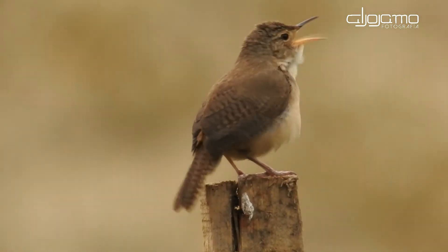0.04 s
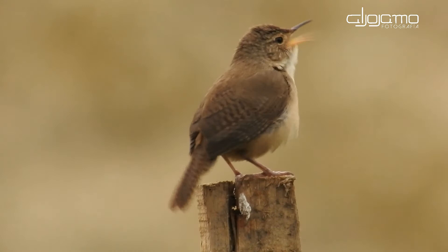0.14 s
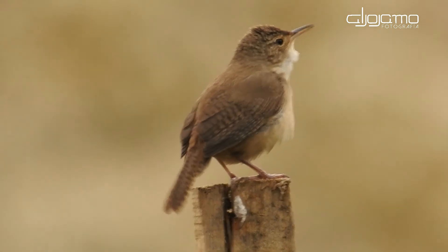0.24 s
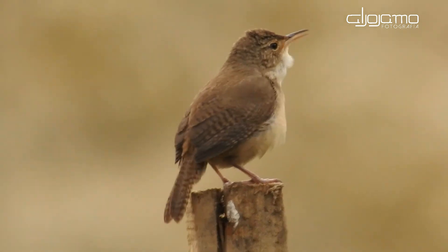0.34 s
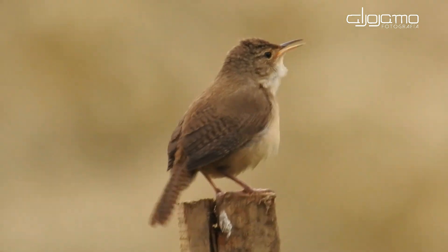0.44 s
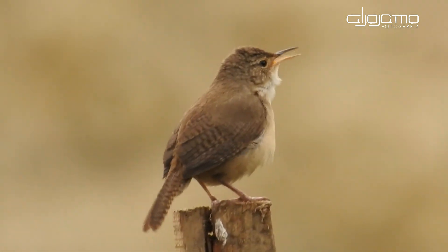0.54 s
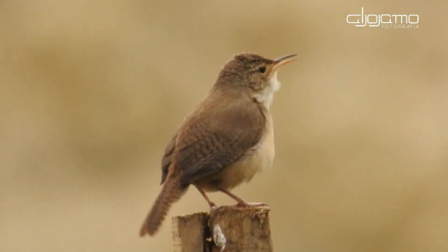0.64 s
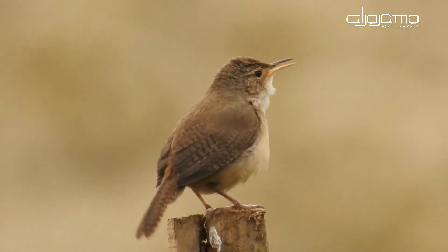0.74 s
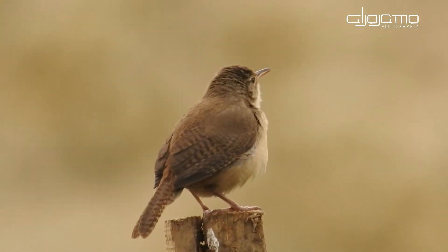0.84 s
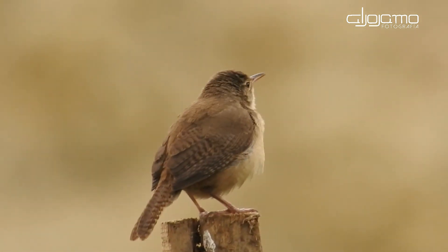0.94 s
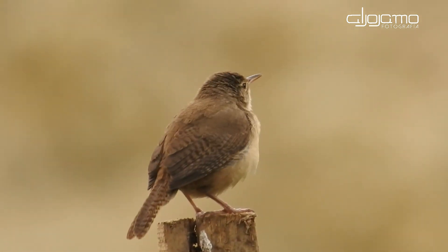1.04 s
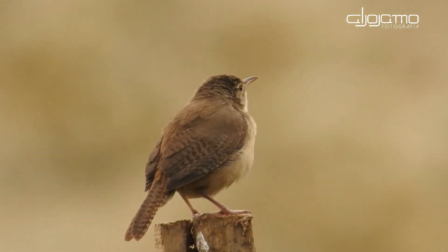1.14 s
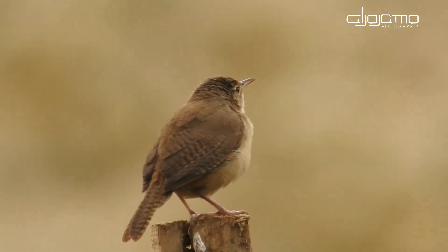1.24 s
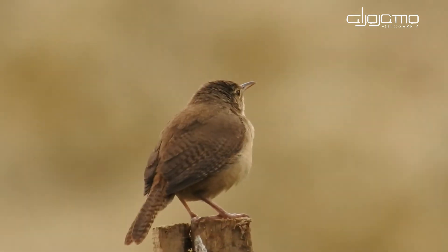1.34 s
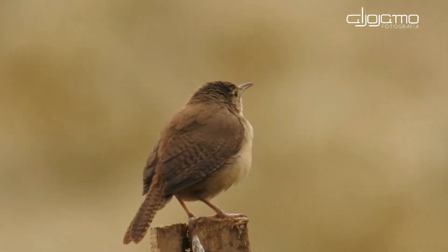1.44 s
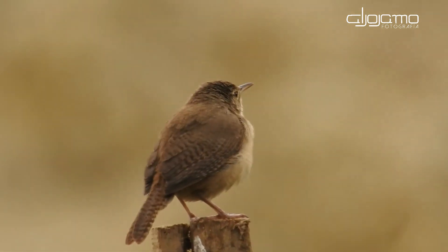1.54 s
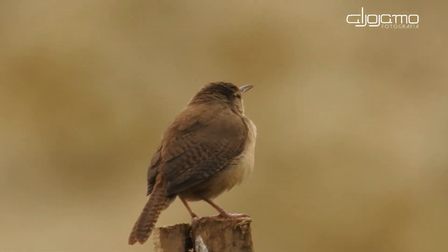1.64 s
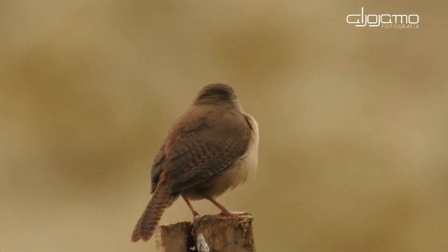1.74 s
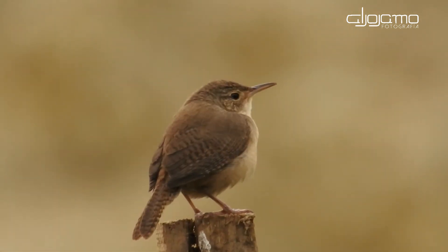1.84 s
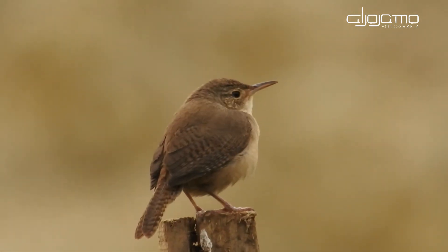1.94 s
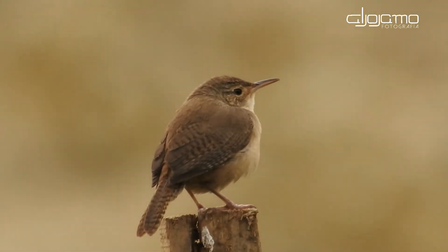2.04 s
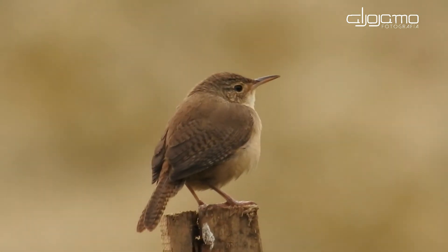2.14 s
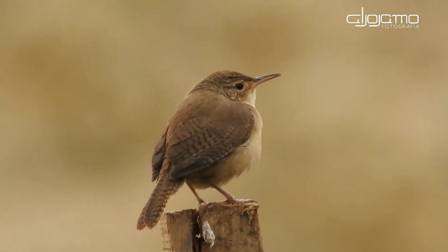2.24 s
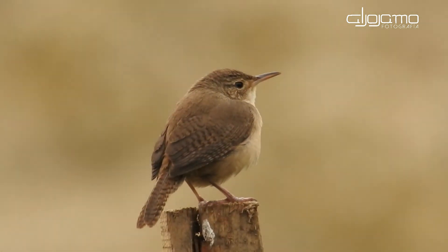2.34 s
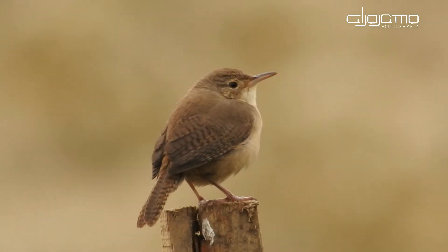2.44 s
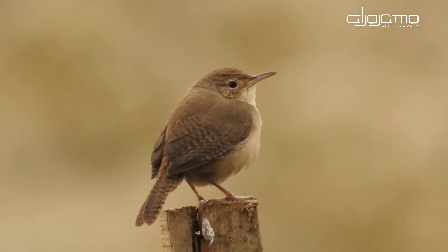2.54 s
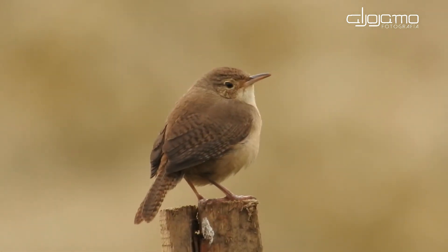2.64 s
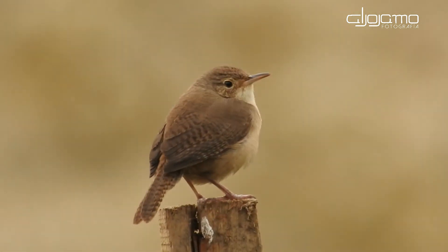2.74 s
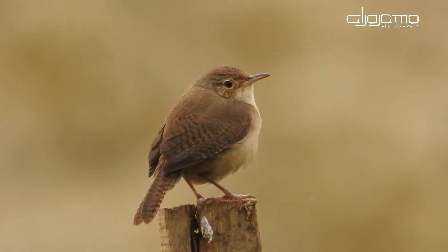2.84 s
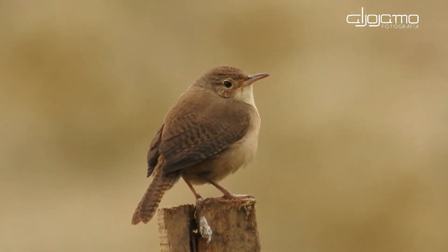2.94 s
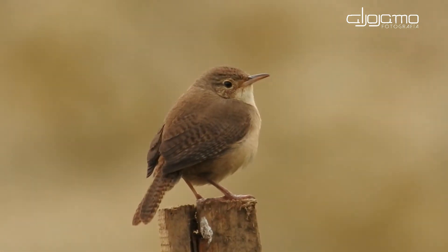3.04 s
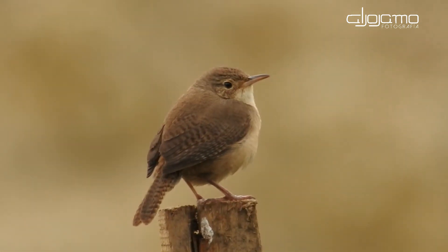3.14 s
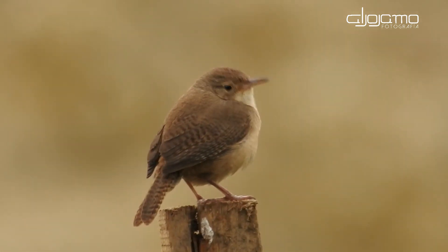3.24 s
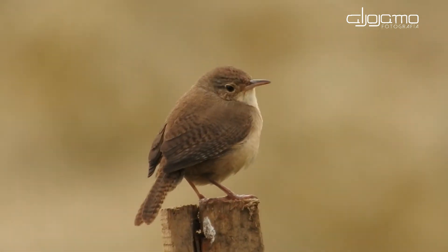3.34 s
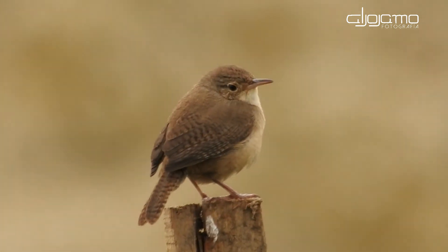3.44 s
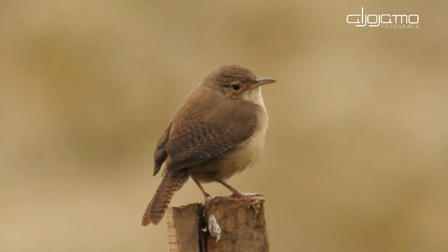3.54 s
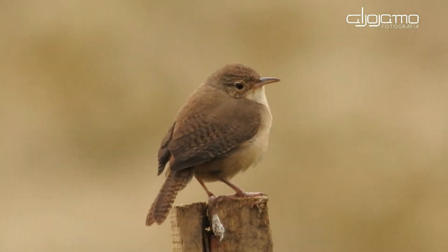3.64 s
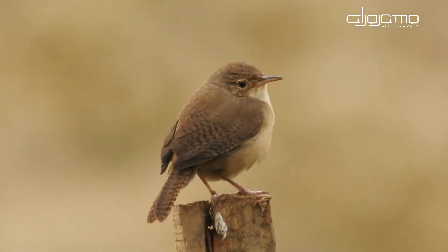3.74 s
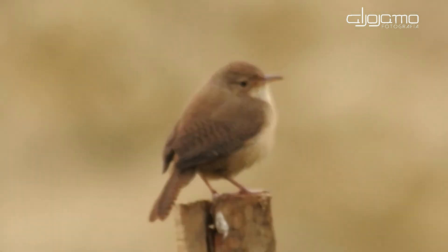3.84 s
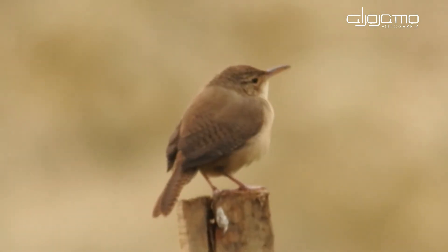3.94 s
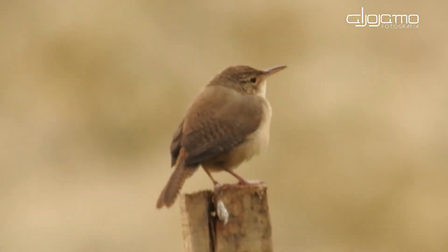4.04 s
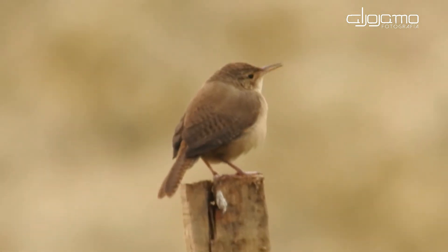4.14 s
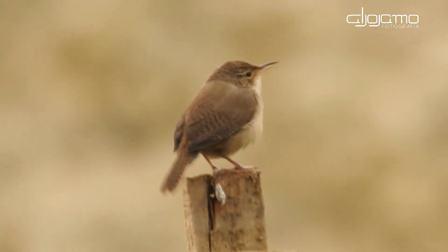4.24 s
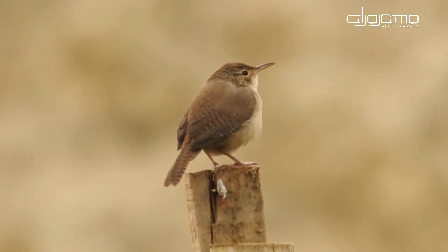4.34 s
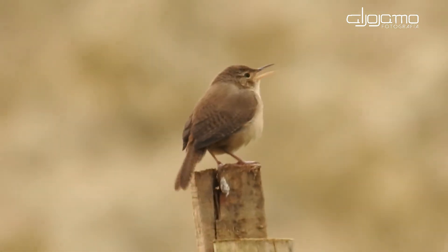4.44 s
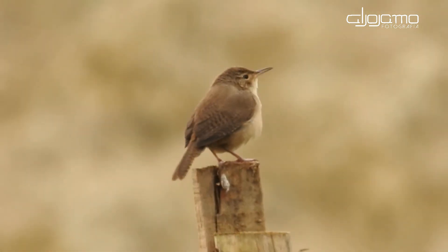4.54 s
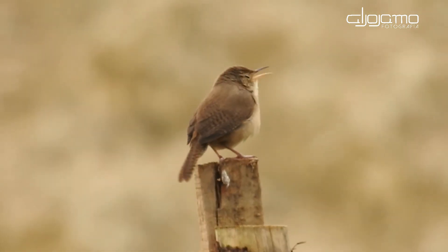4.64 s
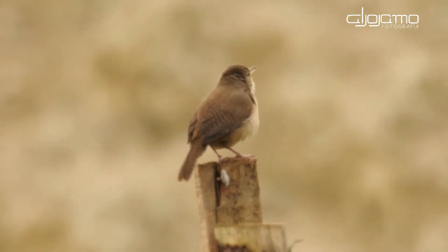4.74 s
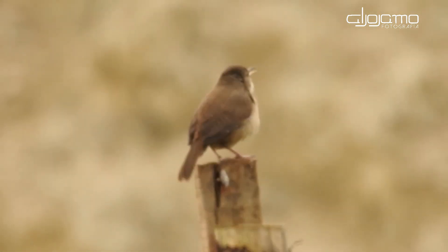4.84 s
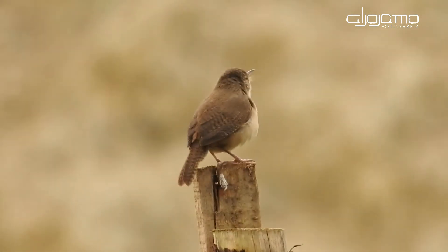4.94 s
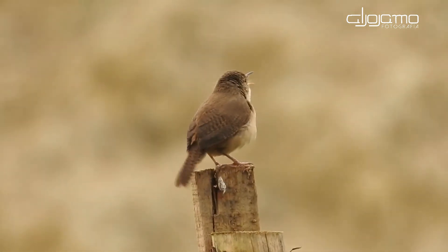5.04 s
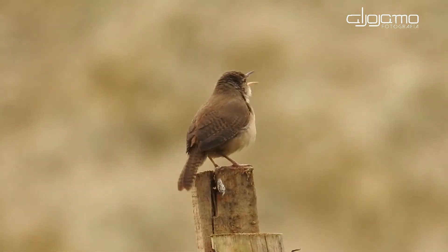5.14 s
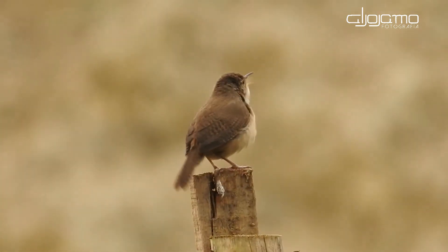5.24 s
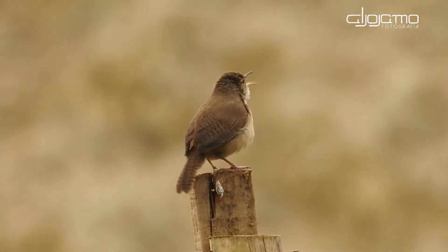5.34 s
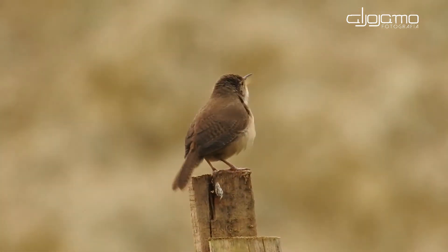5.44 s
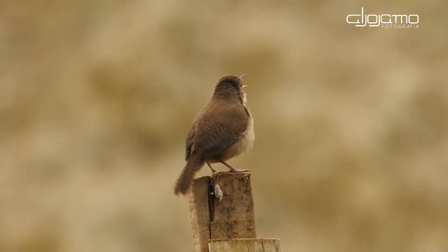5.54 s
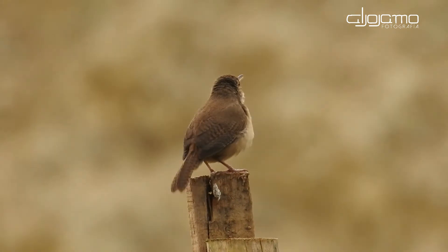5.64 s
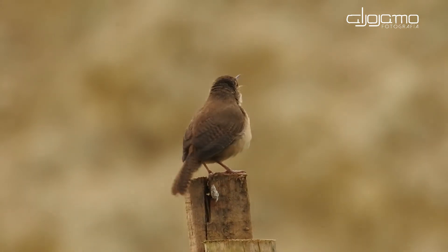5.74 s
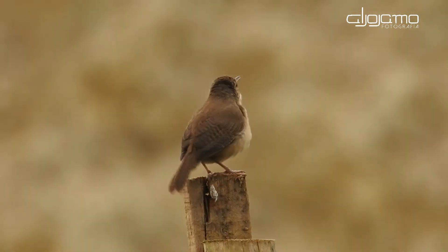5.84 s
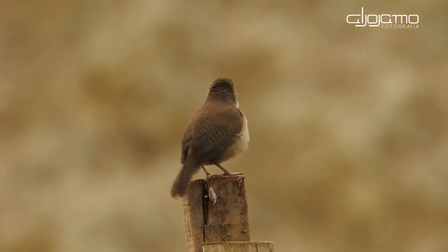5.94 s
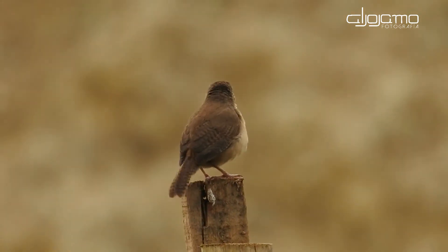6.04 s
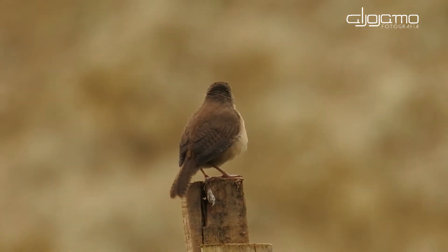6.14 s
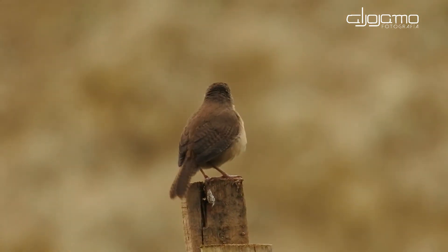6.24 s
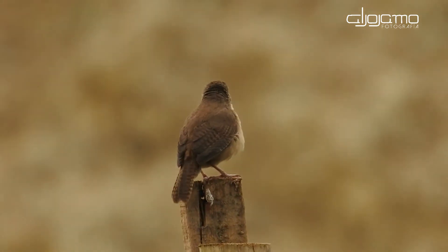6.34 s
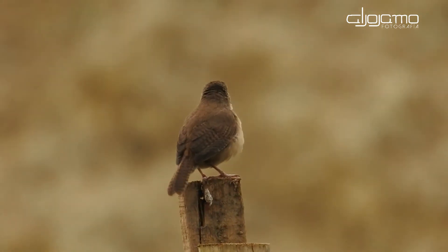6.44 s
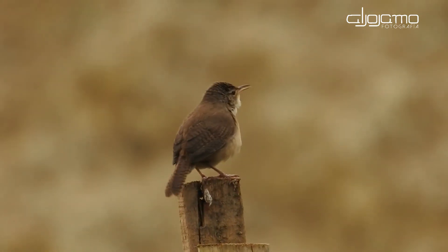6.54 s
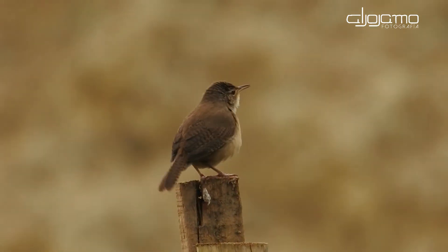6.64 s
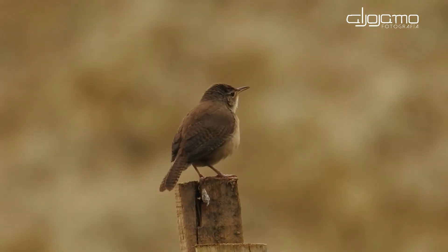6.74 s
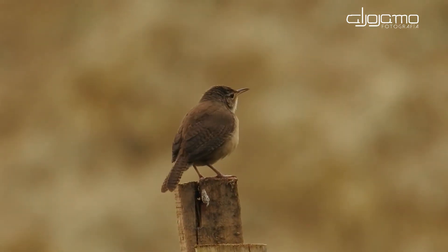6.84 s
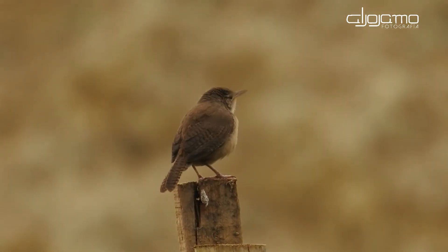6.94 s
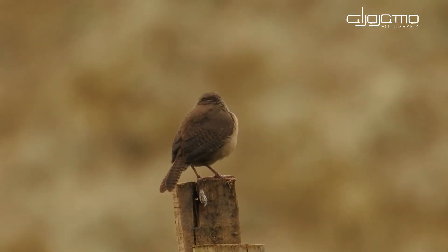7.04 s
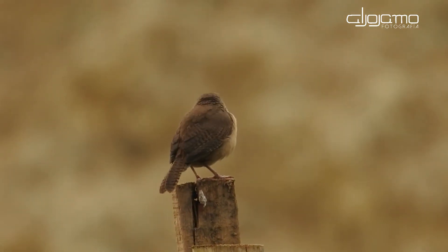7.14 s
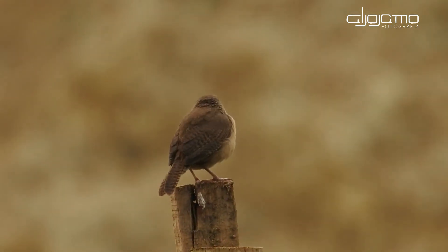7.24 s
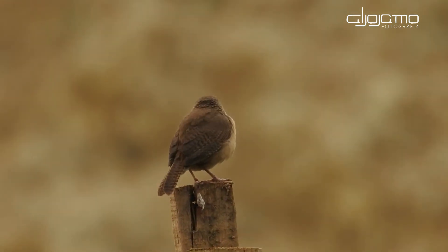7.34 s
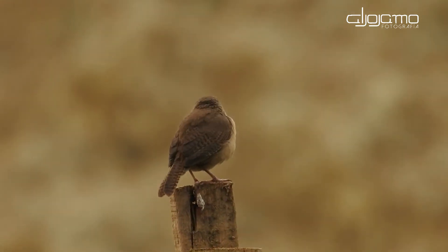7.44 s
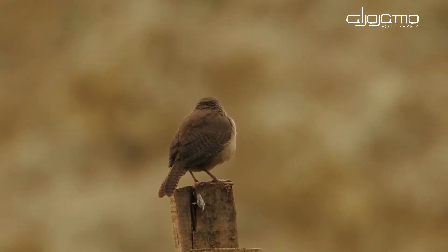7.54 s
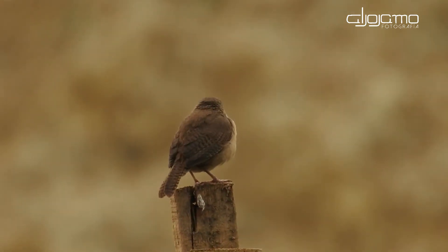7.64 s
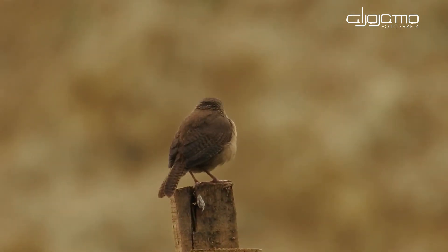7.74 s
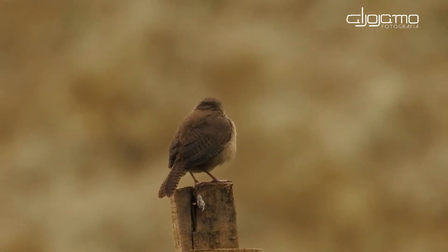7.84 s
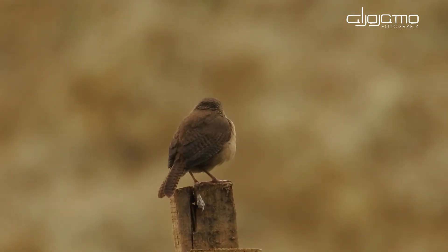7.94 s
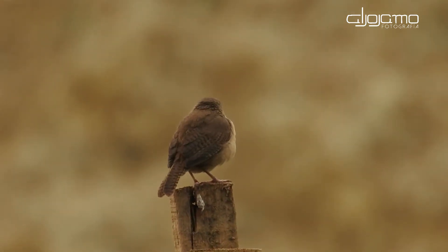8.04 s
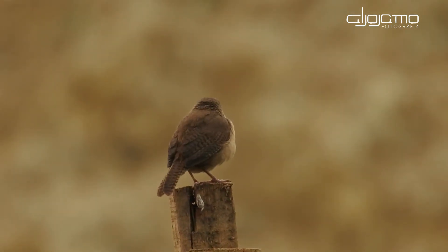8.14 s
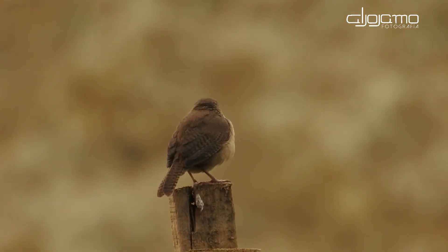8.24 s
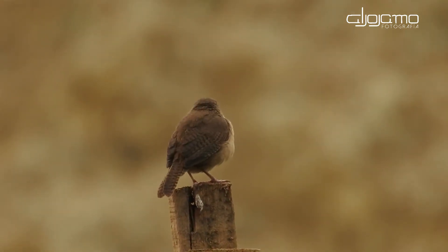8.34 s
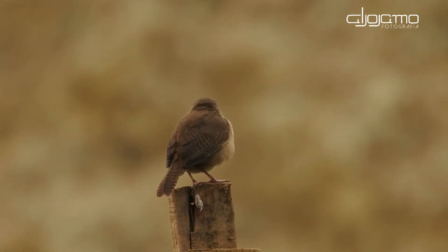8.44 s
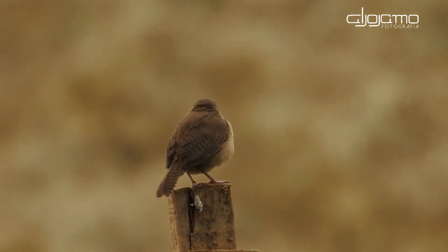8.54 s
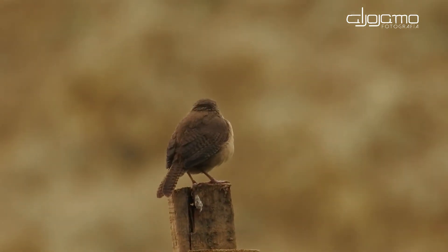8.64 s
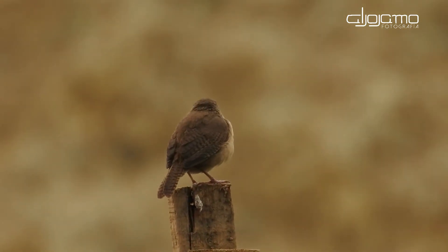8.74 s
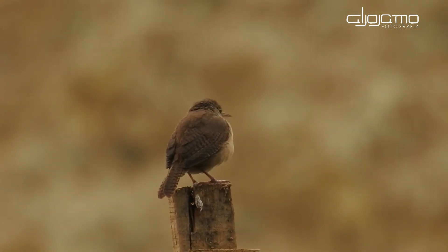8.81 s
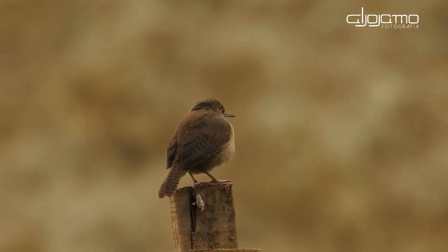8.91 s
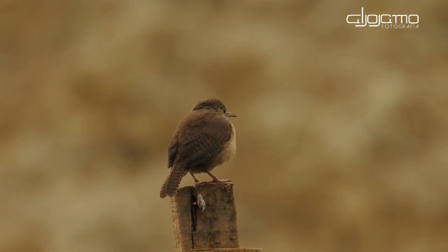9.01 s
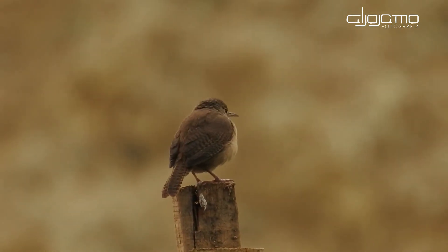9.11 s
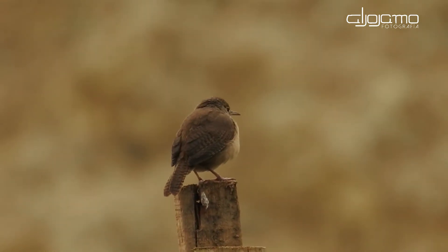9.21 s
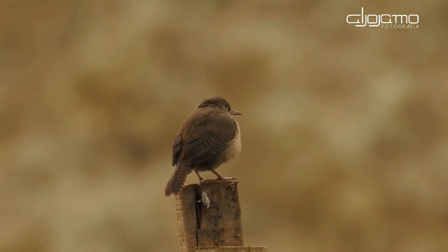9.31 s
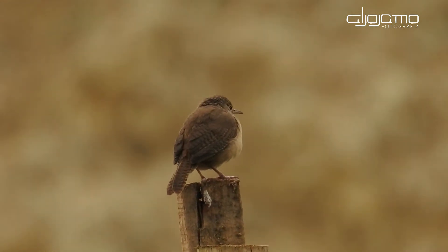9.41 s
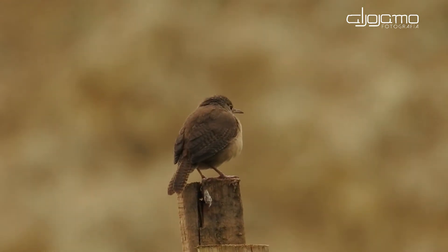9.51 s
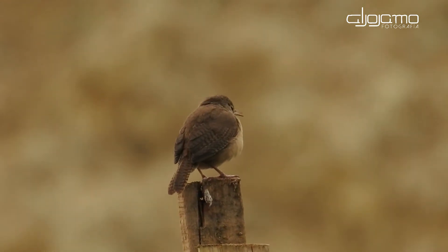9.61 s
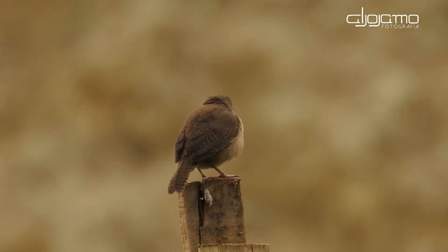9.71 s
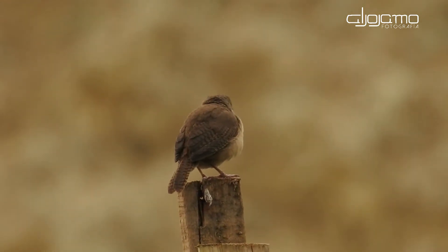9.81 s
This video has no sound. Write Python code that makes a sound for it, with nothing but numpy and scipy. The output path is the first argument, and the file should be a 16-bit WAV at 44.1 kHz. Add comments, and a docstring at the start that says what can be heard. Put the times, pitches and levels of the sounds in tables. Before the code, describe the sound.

A quiet outdoor place with faint flickering insect hiss and a short scattering echo from leaves. At 0 s a wren is already singing: loud, clean, rapidly bent high whistles until about 0.4 s, a softer low dip, then a dry low rattle from 0.5 to 0.9 s. Another bird whistles a thin high run at 0.8-1.1 s. From 1.1 to 3.8 s it is sparse: small chips, very faint calls and a distant downward slide at 3.25 s with an echo. From 3.85 to 5 s, hoarse churrs, rustling, ticks and dull knocks near the microphone surround soft squeaky wren notes. At 5-6.2 s the loud trill returns, alternating rising and hooked notes over a faint low hum, with a weaker rattle at 6.5-6.75 s. Until nearly 10 s only scattered chips, faint churrs, a far tiny trill around 8.0-8.5 s and distant whistles remain.

```python
"""A wren on a post among trees: bent near-sine whistles, a loud trill of hooks and rises, then a low noise rattle.
The trill and rattle come twice; soft mixed notes, with harsh pulsed noise around them, lead into the second.
Other birds chip, whistle and churr near and far; leaves and trunks scatter the notes into a short noise tail.
Close to the microphone struck modes tick and knock, noise rustles and rumbles, and a low tone hums.
Far noise and insects lie under it all as flickering bands of noise."""
import sys
import numpy as np
from scipy import signal
from scipy.io import wavfile
from scipy.ndimage import uniform_filter1d

SR = 44100
rng = np.random.default_rng(int(sys.argv[2]) if len(sys.argv) > 2 else 0)


def master(y):
    """Save y as 16-bit WAV."""
    cut = np.clip(np.atleast_2d(y).T, -1, 1)
    pcm = np.round(cut * 32767)  # scale
    wavfile.write(sys.argv[1], SR, pcm.astype(np.int16))


def volts_from_db(level):
    """Convert decibel levels to linear amplitude ratios."""
    exponent = np.asarray(level, float) / 20
    return 10 ** exponent


N = 435266   # samples


def rms_one(x):
    """Scale to rms 1."""
    return x / np.sqrt(np.mean(x ** 2) + 1e-20)


def at_hz(points, hz):
    """Read a table on a log-frequency axis."""
    table_hz, values = np.transpose(points)
    return np.interp(np.log(hz), np.log(table_hz), values)


def in_time(rows):
    """The columns of a curve read at every sample."""
    s, *columns = np.transpose(rows)
    return [np.interp(np.arange(N) / SR, s, column) for column in columns]


def sides(pan_db):
    """Left and right gain; the two microphones sit close, so the difference is held within 7 dB."""
    half_db = np.clip(pan_db, -7, 7) / 2
    return volts_from_db(np.array([[half_db], [-half_db]]))


def band(x, low_hz, high_hz):
    """Butterworth band-pass."""
    sos = signal.butter(3, [low_hz, min(high_hz, .45 * SR)], "band", fs=SR, output="sos")
    return signal.sosfilt(sos, x)


def drift(rate_hz, size):
    """Random wandering of spread about 1, with a new target rate_hz times a second."""
    step = SR / rate_hz
    targets = int(size / step) + 2
    wander = np.interp(np.arange(size) / step, np.arange(targets), rng.standard_normal(targets))
    return wander * np.sqrt(1.5)   # makes up for the spread lost between targets


def stereo(mid, side, alike):
    """Two independent noises turned into left and right with the given likeness."""
    return np.sqrt(1 + alike) * mid + np.sqrt(1 - alike) * side * [[1], [-1]]


def add(out, s, sound):
    """Mix a stereo sound in at s seconds."""
    i = round(s * SR)
    a, b = max(i, 0), min(i + sound.shape[1], N)
    out[:, a:b] += sound[:, a - i:b - i]


def repeated(shape, sung):
    """One syllable laid out at every place where it is sung."""
    s, hz, db = np.transpose(shape)
    notes = []
    for at, level_db, stretch, pan_db in sung:
        sweep = hz.min() + stretch * (hz - hz.min())
        notes.append((pan_db, np.transpose([at + s, sweep, level_db + db])))
    return notes


def bent(notes, swell):
    """Pitch bends smoothly through start, middle and end; the level swells to a peak and sinks."""
    peak, start_db, end_db, pan_db = swell
    u, peak = np.linspace(0, 1, num=9), np.clip(peak, .1, .9)
    before, after = np.clip(1 - u / peak, 0, 1), np.clip((u - peak) / (1 - peak), 0, 1)
    shape_db = -start_db * before ** 2 - end_db * after ** 2
    # parabola through the three pitches
    bend = np.array([(1 - u) * (1 - 2 * u), 4 * u * (1 - u), u * (2 * u - 1)])
    return [(pan_db, np.transpose([s + length * u, np.dot(hz, bend), db + shape_db]))
            for s, length, *hz, db in notes]


def whistles(notes, octave_db, rough, breath_db, fade_s=.004):
    """Near sines from the syrinx with a faint octave, a fast flutter and a skirt of breath noise."""
    out = np.zeros((2, N))
    for pan_db, rows in notes:
        s, hz, db = np.transpose(rows)
        t = np.arange(s[0] - fade_s, s[-1] + fade_s, 1 / SR)
        glide = uniform_filter1d(np.interp(t, s, hz), size=90)      # muscles round the corners of a glide
        phase = 2 * np.pi * (np.cumsum(glide) / SR + rng.random())
        to_end = np.minimum(t - t[0], t[-1] - t)
        edge = np.sin(np.pi / 2 * np.clip(to_end / (2 * fade_s), 0, 1)) ** 2
        flutter = 1 + rough * drift(300, size=len(t)) + volts_from_db(breath_db) * drift(2500, size=len(t))
        tone = np.sin(phase) + volts_from_db(octave_db) * np.sin(2 * phase)
        level = volts_from_db(uniform_filter1d(np.interp(t, s, db), size=130))
        add(out, t[0], sides(pan_db) * level * edge * flutter * tone)
    return out


def sing(notes, voice):
    """Whistles at the level heard directly, and at the level sent into the trees."""
    direct_db, scattered_db, *texture = voice
    song = whistles(notes, *texture)
    return volts_from_db(direct_db) * song, volts_from_db(scattered_db) * song


def rasps(notes, softness, skirt, pulse_hz=115, depth=.5, grain_db=1.5, cut_hz=9300):
    """Harsh sounds: noise in one resonance, chopped into uneven pulses."""
    out = np.zeros((2, N))
    for s, length, hz, width, db, pan_db in notes:
        t = np.arange(0, length, 1 / SR)
        resonance = signal.butter(1, [hz - width / 2, hz + width / 2], "band", fs=SR)
        noise = signal.lfilter(*resonance, rng.standard_normal(len(t) + 400))
        noise = band(noise, max(hz - skirt * width, 300), hz + skirt * width)
        noise = rms_one(noise[400:])   # drop the onset of the filters
        pulse = np.cumsum(pulse_hz * (1 + .2 * drift(30, size=len(t)))) / SR
        chop = 1 + depth * np.sin(2 * np.pi * pulse)
        grain = volts_from_db(grain_db * drift(60, size=len(t)))
        swell = np.sin(np.pi * t / length) ** softness
        add(out, s, sides(pan_db) * volts_from_db(db) * swell * chop * grain * noise)
    return band(out, 500, cut_hz)


# The wren as heard from its post: direct gain in dB, scattered gain in dB, octave in dB relative to the
# whistle, flutter as a ratio, breath in dB.
WREN_VOICE = (1.5, 1.0, -54, .35, -24)
# Pitch paths of the loud syllables. Each row: seconds from its start, pitch in Hz before the stretch,
# level in dB relative to the level where it is sung.
LEAD_IN = [(-.012, 5120, -32), (-.007, 5436, -14), (-.003, 6300, -21)]
HOOK = [(0, 5050, -5.5), (.003, 5500, -0.5), (.006, 5620, 4.5), (.01, 4600, -6.5), (.015, 3980, -15),
        (.02, 4276, -4.5), (.028, 4420, -7), (.038, 4600, -4.5)]
RISE = [(0, 1900, -22), (.015, 2080, -11), (.03, 2700, -6), (.045, 3380, -3), (.056, 3660, -1),
        (.066, 3700, -3), (.076, 3640, -10)]
PLUNGE = [(0, 8230, -19.5), (.015, 6867, -5), (.03, 5650, 2), (.045, 4530, -13.5), (.06, 4095, -14),
          (.075, 4424, -7.5), (.09, 4570, -3.5), (.11, 4634, -11.5)]
LOW_DIP = [(0, 2882, -14), (.012, 2412, -1.5), (.035, 2070, -2.5), (.065, 2150, -7.5), (.105, 2260, -12)]
# Where they are sung. Each row: start in seconds, level in dB before the voice gain, stretch of the
# sweep above its lowest pitch as a ratio, left over right in dB.
HOOKS = [(.026, -9.5, .98, -1), (.215, -11, .98, 0), (5.319, -13, 0.88, 0), (5.513, -13.5, 0.81, 0),
         (5.7, -11.5, 1.12, 1), (5.889, -13, 0.84, 0.5), (6.088, -12, 1.1, 1)]
RISES = [(0.108, -20, 1.006, -1.3), (5.215, -24.5, 1, -1.9), (5.406, -23, 0.93, -1.3),
         (5.595, -23, 0.99, -1.45), (5.782, -22, .99, -1.2), (5.983, -24, 0.93, -0.86)]
PLUNGES = [(5.074, -13, 1, 0.1)]
LOW_DIPS = [(.43, -36.5, 1.03, 1.3), (6.405, -36.5, 0.81, -0.99)]


def wren_trill():
    """The whistles of the trill: syrinx sweeps that hook over or rise, with a plunge and low dips."""
    notes = repeated(PLUNGE, PLUNGES) + repeated(LOW_DIP, LOW_DIPS)
    notes += repeated(LEAD_IN, HOOKS) + repeated(HOOK, HOOKS) + repeated(RISE, RISES)
    return sing(notes, WREN_VOICE)


# The wren's softer voice: direct gain in dB, scattered gain in dB, octave in dB relative to the whistle,
# flutter as a ratio, breath in dB.
SOFT_WREN_VOICE = (-2.5, 0.5, -54.5, 0.95, -11)
# Each row: start in seconds, length in seconds, start pitch, middle pitch and end pitch in Hz,
# peak level in dB before the voice gain.
WREN_NOTES = [(0, 0.012, 3320, 3556, 3630, -21.5), (3.905, .03, 8670, 6950, 5430, -31.5),
              (4.015, 0.025, 9970, 7480, 4930, -33), (4.175, .02, 7750, 7977, 7500, -41),
              (4.196, .045, 6650, 6998, 7243, -33), (4.3, 0.049, 4250, 3753, 3440, -57),
              (4.305, 0.028, 7060, 8100, 9100, -38.5), (4.455, .025, 7550, 8490, 8680, -37.5),
              (4.565, 0.058, 4250, 3616, 3260, -48), (4.565, 0.027, 5190, 5220, 5040, -32.5),
              (4.56, .05, 7077, 7040, 6960, -36.5), (4.665, .035, 8910, 8970, 8160, -44.5),
              (4.69, 0.047, 8300, 7580, 7245, -33.5), (4.73, 0.021, 3570, 3490, 3380, -53),
              (4.735, 0.043, 4380, 4226, 4200, -36), (4.735, 0.03, 5820, 5690, 5170, -29),
              (4.945, 0.045, 8380, 7360, 6000, -29.5), (5.0, 0.12, 6345, 7360, 7310, -26.5),
              (5.065, 0.03, 6850, 6500, 6000, -23.5), (5.21, 0.048, 7860, 7500, 6800, -36)]
# Share of the length at which a note peaks, start and end in dB under the peak, left over right in dB.
WREN_SWELL = (0.4, 14, 6, .6)
# Pitch paths. Each row: seconds from the start, pitch in Hz before the stretch, relative level in dB.
SWOOP = [(0, 5800, -10), (.013, 6420, -1.5), (.032, 5473, -3), (.05, 5220, -2), (.066, 5132, -11)]
LOW_DROP = [(0, 2350, -20.5), (.008, 1980, 0.5), (.018, 1600, -3.5), (.03, 1250, -10.5)]
# Where they are sung. Each row: start in seconds, level in dB before the voice gain, stretch of the
# sweep as a ratio, left over right in dB.
SWOOPS = [(4.296, -29.5, 0.93, -1), (4.559, -26, .99, -1.1)]
LOW_DROPS = [(0.333, -36, 1.04, -0.47), (6.199, -39.5, 0.97, .8), (6.326, -43.5, .97, -0.87)]


def wren_soft_notes():
    """Short mixed whistles, swoops and low drops from the syrinx, some of them overlapping."""
    notes = bent(WREN_NOTES, WREN_SWELL) + repeated(SWOOP, SWOOPS) + repeated(LOW_DROP, LOW_DROPS)
    return sing(notes, SOFT_WREN_VOICE)


# Broad harsh noises: short rasps and longer washes of noise around the wren's notes and the ticks.
# Each row: start in seconds, length in seconds, centre in Hz, level in dB before pulsing.
RASPS = [(.01, .06, 6960, -34.5), (.201, 0.073, 7500, -38.5), (3.85, 0.049, 6340, -50),
         (3.901, 0.22, 6100, -45), (3.994, 0.28, 7500, -56.5), (4.288, 0.091, 6100, -39),
         (4.423, 0.064, 5970, -41), (4.451, .2, 6580, -44), (4.495, 0.2, 2730, -55)]
# The low rattle that ends each song. Each row: start in seconds, level in dB before pulsing.
RATTLE = [(.54, -52.5), (.607, -51), (.669, -53), (.734, -54), (.798, -52), (.874, -51), (6.515, -53),
          (6.582, -55.5), (6.644, -59), (6.722, -61)]
RATTLE_S, RATTLE_HZ = .031, 2150   # length of one note, centre


def broad_noises_and_rattle():
    """Rasps, washes and rattle: pulsed noise with a bandwidth that is a fixed share of the centre."""
    broad = RASPS + [(s, RATTLE_S, RATTLE_HZ, db) for s, db in RATTLE]
    broad = [(s, length, hz, 0.41 * hz, db, 0.1) for s, length, hz, db in broad]
    return rasps(broad, skirt=.6, softness=0.3)


# The neighbour as heard: direct gain in dB, scattered gain in dB, octave in dB relative to the whistle,
# flutter as a ratio, breath in dB.
NEIGHBOUR_VOICE = (-.5, 2.5, -75, .5, -40)
# Each row: start in seconds, length in seconds, start pitch, middle pitch and end pitch in Hz,
# peak level in dB before the voice gain.
NEIGHBOUR_NOTES = [(.79, .03, 6280, 6440, 6140, -33.5), (.828, .042, 6255, 6260, 5830, -23),
                   (.88, .09, 5990, 6600, 6680, -21.5), (.975, .095, 5927, 5784, 5820, -29.5)]
# Share of the length at which a note peaks, start and end in dB under the peak, left over right in dB.
NEIGHBOUR_SWELL = (0.28, 13, 14, 2)


def neighbour():
    """Another bird whistles a short run of gently bent near sines."""
    return sing(bent(NEIGHBOUR_NOTES, NEIGHBOUR_SWELL), NEIGHBOUR_VOICE)


# The chippers among the leaves: direct gain in dB, scattered gain in dB, octave in dB relative to the
# whistle, flutter as a ratio, breath in dB.
CHIPPER_VOICE = (-8.5, 7.5, -51.5, 1.91, -16)
# Each row: start in seconds, length in seconds, start pitch, middle pitch and end pitch in Hz,
# peak level in dB before the voice gain.
CHIPPER_NOTES = [(2.145, .065, 8770, 7683, 5190, -39), (2.4, .045, 9300, 7570, 7200, -65.5),
                 (2.83, .055, 7500, 7640, 5940, -66), (3.145, .03, 8280, 6700, 5027, -42),
                 (3.51, .03, 8546, 7200, 5826, -41), (3.68, .16, 2443, 2495, 2446, -59.5),
                 (7.335, .06, 8664, 7368, 5785, -40.5), (7.915, .035, 7800, 9480, 7670, -67.5),
                 (8.338, .042, 8480, 7623, 6145, -43.5), (8.515, .09, 7184, 7200, 5730, -41.5),
                 (8.6, .055, 6624, 6100, 6416, -45), (9.49, .045, 7966, 7764, 8030, -50),
                 (9.505, .035, 7400, 6150, 6090, -48.5), (9.65, .02, 7934, 8020, 8780, -61),
                 (9.77, .02, 6434, 6940, 6200, -55), (9.8, .06, 7500, 6200, 6620, -50.5)]
# Share of the length at which a note peaks, start and end in dB under the peak, left over right in dB.
CHIPPER_SWELL = (0.72, 9.8, 8.8, 1.5)
# Pitch path. Each row: seconds from the start, pitch in Hz before the stretch, relative level in dB.
CHIP = [(0, 8540, -11.5), (.01, 9830, -10.5), (.018, 8100, -3.5), (.026, 6440, -2), (.032, 5630, -17.5)]
# Each row: start in seconds, level in dB before the voice gain, stretch as a ratio, left over right
# in dB.
CHIPS = [(0.126, -35.5, 0.94, 3), (.228, -35.5, 0.85, 0.5), (0.398, -50.5, 1.01, -3.5)]


def chippers():
    """Short rough whistles, mostly high, with more scattered than direct sound."""
    return sing(bent(CHIPPER_NOTES, CHIPPER_SWELL) + repeated(CHIP, CHIPS), CHIPPER_VOICE)


# Narrow hoarse calls from several sides. Each row: start in seconds, length in seconds, centre in Hz,
# level in dB before pulsing, left over right in dB before the 7 dB limit.
CHURRS = [(3.097, 0.25, 2300, -58, -6), (3.896, 0.33, 2500, -49, -9), (4.019, 0.4, 4530, -44.5, 14),
          (4.242, 0.21, 3040, -51.5, -9), (4.837, 0.048, 2600, -37.5, -1), (4.96, 0.048, 2580, -35, -1),
          (7.018, 0.16, 6480, -55, -11.5), (7.432, .091, 2450, -70.5, -3.5), (7.498, .17, 6410, -54, -7),
          (7.702, .14, 6240, -59, -10.5), (7.763, 0.066, 2740, -70.5, 3), (7.668, 0.32, 4890, -74.5, 2.7),
          (7.913, .22, 1462, -63.5, -5.5), (7.92, 0.19, 2937, -61.5, -2.5), (8.52, 0.12, 4800, -66.5, -4.2),
          (8.491, 0.16, 2770, -69, -0.5), (8.785, .1, 3270, -67, -3), (8.96, 0.17, 2550, -70.5, -11.5),
          (8.681, 0.27, 5360, -66, -1), (9, 0.19, 4370, -75, -0.5), (9.563, 0.43, 5810, -62.5, 0)]


def churrs():
    """Hoarse calls: pulsed noise in a throat resonance 303 Hz wide."""
    narrow = [(s, length, hz, 303, db, pan_db) for s, length, hz, db, pan_db in CHURRS]
    return rasps(narrow, skirt=3.44, softness=0.81)


# The faint birds as heard: direct gain in dB, scattered gain in dB, octave in dB relative to the
# whistle, flutter as a ratio, breath in dB.
FAINT_VOICE = (-5.0, -3.0, -55, .3, -28)
# Each row: start in seconds, length in seconds, start pitch, middle pitch and end pitch in Hz,
# peak level in dB before the voice gain.
FAINT_NOTES = [(1.045, .03, 4700, 4750, 4720, -58.5), (2.64, 0.23, 3884, 3807, 3780, -77.5),
               (2.9, 0.19, 3750, 3885, 3740, -73.5), (3.07, .05, 7350, 6950, 6590, -70.5),
               (9.025, 0.021, 4800, 4200, 3630, -62), (9.098, 0.011, 7800, 6480, 5200, -73.5),
               (6.65, .05, 6420, 5650, 5040, -78), (7.45, 0.019, 3580, 3575, 3520, -61),
               (7.46, 0.069, 1790, 1780, 1825, -59), (7.53, 0.019, 4540, 4560, 4700, -55),
               (7.62, .02, 3670, 3540, 3550, -67), (7.68, 0.05, 5600, 4720, 4690, -53),
               (7.8, .02, 3600, 3540, 3500, -71), (7.855, .015, 5570, 5200, 4800, -56)]
# Share of the length at which a note peaks, start and end in dB under the peak, left over right in dB.
FAINT_SWELL = (0.16, 5, 6.2, 2.5)
# Pitch paths. Each row: seconds from the start, pitch in Hz before the stretch, relative level in dB.
FAR_DROP = [(0, 4135, 1), (.008, 4060, 1), (.02, 2800, 7)]
FAINT_FALL = [(0, 5300, 6), (.03, 4420, 8), (.08, 3800, 4), (.14, 3730, -13.5)]
FAINT_ARCH = [(0, 4500, -6), (.01, 5500, 0), (.06, 5530, -4), (.085, 4800, -2.5)]
# Each row: start in seconds, level in dB before the voice gain, stretch as a ratio, left over right
# in dB.
FAINT_FALLS = [(2.55, -81, 1.01, -3.5), (2.84, -78, .95, 1.8), (3.09, -72, 1.05, .2)]
FAINT_ARCHES = [(2.73, -75, 1.01, 3.5), (2.98, -75, .99, 6)]
# First and last note of the far trill, level in dB before the voice gain.
FAR_TRILL_SWELL = (-65, -66)
FAR_TRILL_S, FAR_TRILL_GAP_S, FAR_TRILL_NOTES = 8.027, .0455, 11   # start, spacing, count


def faint_birds():
    """Faint bent whistles, falls and arches, and a far trill of evenly spaced drops."""
    levels = np.linspace(*FAR_TRILL_SWELL, num=FAR_TRILL_NOTES)
    trill = [(FAR_TRILL_S + k * FAR_TRILL_GAP_S, db, 1, 2.5) for k, db in enumerate(levels)]
    notes = bent(FAINT_NOTES, FAINT_SWELL) + repeated(FAR_DROP, trill)
    notes += repeated(FAINT_FALL, FAINT_FALLS) + repeated(FAINT_ARCH, FAINT_ARCHES)
    return sing(notes, FAINT_VOICE)


# Left-right likeness of the echoes. Each row: frequency in Hz, likeness as a ratio.
SCATTER_LIKENESS = [(1000, .75), (2500, .72), (4500, .45), (8000, .05)]
# Decay of the echoes. Each row: frequency in Hz, time to fall 60 dB in seconds.
SCATTER_T60 = [(1500, 0.49), (4500, 0.29), (9000, 0.34)]


def scatter(x, near_db=14.5, near_s=0.0086, bend=1.166):
    """Echoes: a strong cluster from ground and close branches, then noise from far leaves that dies by band."""
    t = np.arange(SR * 7 // 10) / SR
    white, edges, tail = rng.standard_normal((2, len(t))), np.geomspace(400, 16000, num=9), 0
    for low, high in zip(edges, edges[1:]):
        hz = np.sqrt(low * high)
        both = stereo(*band(white, low, high), at_hz(SCATTER_LIKENESS, hz))
        tail = tail + both * volts_from_db(-60 * (t / at_hz(SCATTER_T60, hz)) ** bend)
    tail = tail * (1 + volts_from_db(near_db) * np.exp(-t / near_s)) * np.clip(t / 0.005, 0, 1)
    tail = tail / np.sqrt(np.sum(tail ** 2) / 2)   # unit energy a side, on average
    return signal.fftconvolve(x, tail, axes=1)[:, :N]


# The far birds as heard: direct gain in dB, scattered gain in dB, octave in dB relative to the whistle,
# flutter as a ratio, breath in dB.
FAR_VOICE = (-10.0, 0.0, -55, .35, -26)
# Each row: start in seconds, length in seconds, start pitch, middle pitch and end pitch in Hz,
# peak level in dB before the voice gain.
FAR_NOTES = [(8.705, .035, 4310, 3610, 3296, -50), (8.775, .015, 3346, 2980, 2585, -51),
             (8.86, 0.029, 4920, 3880, 3460, -49.5), (8.945, 0.0047, 3480, 2804, 2350, -43.5),
             (9.1, 0.084, 5590, 4940, 4580, -60), (9.25, .09, 3630, 3196, 2870, -70),
             (9.4, .06, 4580, 4480, 4140, -71), (9.46, 0.1, 4286, 3155, 2946, -55)]
# Share of the length at which a note peaks, start and end in dB under the peak, left over right in dB.
FAR_SWELL = (0.45, 6.2, 5, 1)
# Downward pitch path. Each row: seconds from the start, pitch in Hz before the stretch, relative level
# in dB.
SLIDE = [(0, 6760, -12), (.08, 6420, -5.5), (.17, 5990, 0.5), (.25, 4940, 2.5), (.32, 4115, -6),
         (.4, 3462, -8.5), (.5, 3094, -2), (.54, 2970, 1)]
# The slide and its strong echo. Each row: start in seconds, level in dB before the voice gain, stretch
# as a ratio, left over right in dB.
SLIDE_AND_ECHO = [(3.25, -44, .99, 7), (3.347, -42.5, 1.01, 0.3)]


def far_birds():
    """Far whistles and one long downward slide with a strong echo a tenth of a second later."""
    notes = bent(FAR_NOTES, FAR_SWELL) + repeated(SLIDE, SLIDE_AND_ECHO)
    direct, send = sing(notes, FAR_VOICE)
    # their echoes start in a strong cluster, hold, then drop away quickly
    return direct + scatter(send, near_db=15.0, bend=2.02)


def struck(blows, modes, below_db):
    """Each blow rings every mode with a strength of its own."""
    out, starts = np.zeros(N), [round(s * SR) for s, db in blows]
    blow_db = np.array(blows)[:, 1]
    for hz, db, t60 in modes:
        strength_db = blow_db + db + below_db + rng.normal(0, 2.5, len(starts))
        clicks = np.full(N, 1e-18)   # a trace of input keeps the filter off vanishingly small numbers
        clicks[starts] = volts_from_db(strength_db) * rng.choice([-1, 1], len(starts))
        r, w = volts_from_db(-60 / (t60 * SR)), 2 * np.pi * hz / SR   # decay and turn per sample
        out += signal.lfilter([0, np.sin(w)], [1, -2 * r * np.cos(w), r * r], clicks)
    return out


# Ticks and knocks close to the microphone. Each row: start in seconds, level in dB before the mode gains.
TICKS = [(3.8467, -31.5), (3.903, -30), (4.4943, -9.5), (4.9111, -23), (4.9426, -17.5)]
KNOCKS = [(3.852, -39), (3.915, -24.5), (4.492, -25.5), (4.949, -27)]
# What they ring. Each row: frequency in Hz, relative level in dB, time to fall 60 dB in seconds.
TICK_MODES = [(1760, -9, 0.017), (2946, -13, 0.0073), (4800, 4, 0.005), (6200, -2.5, 0.023),
              (7500, -10.5, 0.011), (9250, -1.5, 0.0025)]
KNOCK_MODES = [(277, -22, 0.35), (800, -2.5, 0.036), (1100, -1.5, 0.074), (1680, 7, 0.0067)]


def close_taps():
    """Ticks and duller knocks: impulses ringing short damped modes, equal on both sides."""
    taps = struck(TICKS, TICK_MODES, below_db=-7.5) + struck(KNOCKS, KNOCK_MODES, below_db=-6)
    return band(taps, 120, 10000)


# Left-right likeness of noise at the microphones. Each row: frequency in Hz, likeness as a ratio.
LIKENESS = [(40, .9), (130, .97), (300, .88), (550, .65), (1100, .8), (2500, .75), (5000, .5), (9000, .15)]


def coloured_noise(spectrum, patchy_db):
    """Third-octave bands of stereo noise, each with its own level, flicker and likeness; rms 1."""
    out, white = 0, rng.standard_normal((2, 2, N))
    lowest, highest = spectrum[0][0], spectrum[-1][0]
    edges = lowest * 2 ** np.arange(0, np.log2(highest / lowest) + .2, 1 / 3)
    for k, (low, high) in enumerate(zip(edges, edges[1:])):
        mid, side = band(white[k % 2], low, high)   # neighbouring bands use different noise
        hz = np.sqrt(low * high)
        alike = np.clip(at_hz(LIKENESS, hz), -1, 1)
        gain = volts_from_db(at_hz(spectrum, hz) + patchy_db * drift(13, size=N))
        out = out + gain * stereo(mid, side, alike)
    return rms_one(out)


# Level of the rustle close by. Each row: time in seconds, level in dB.
RUSTLING = [(0.0, -65), (0.24, -59.5), (0.49, -71.5), (1.07, -64), (1.13, -75.5), (3.82, -68),
            (3.85, -65.5), (3.93, -43), (3.96, -54), (4.07, -40.5), (4.09, -49.5), (4.26, -45.5),
            (4.34, -49), (4.37, -44), (4.7, -51), (4.81, -82), (4.86, -47.5), (4.92, -62.5), (4.95, -37.5),
            (5.14, -74), (5.33, -70.5), (5.47, -60), (5.66, -67.5), (5.74, -53), (6.13, -73), (6.21, -70.5),
            (6.32, -73), (7.78, -77.5), (8.03, -69), (9.87, -71)]
# Colour of the rustle. Each row: frequency in Hz, relative level in dB per Hz.
RUSTLE = [(210, -50.5), (350, -28), (538, -20), (809, -5), (881, -8), (1210, -2.5), (1600, -11.5),
          (2200, -17.5), (2860, -34.5), (4840, -120)]
# Levels at the low end. Each row: time in seconds, hum in dB before its waver, rumble in dB.
LOW_END = [(0.0, -85.5, -80), (0.11, -66.5, -71.5), (0.66, -67.5, -68), (1.26, -73, -76),
           (1.56, -73.5, -75.5), (1.62, -83, -78.5), (2.5, -81, -77), (2.89, -100, -79.5),
           (3.41, -79, -67.5), (3.71, -88, -76), (4.07, -66.5, -65), (4.7, -71.5, -71), (4.92, -65.5, -80),
           (4.97, -55, -52.5), (5.03, -56.5, -65), (5.74, -53, -62), (6.24, -86, -85.5), (7.09, -73, -75.5),
           (8.55, -88.5, -78.5), (8.93, -67.5, -73.5), (9.23, -86, -76.5), (9.46, -74.5, -74.5),
           (9.81, -89, -75), (9.87, -72, -67)]
# Colour of the rumble. Each row: frequency in Hz, relative level in dB per Hz.
RUMBLE = [(38, -23.5), (50, -9.5), (65, -4.5), (85, -5), (155, -8), (214, -5), (260, -4.5), (310, -11.5),
          (420, -10.5), (600, -10.5)]
# Overtones of the hum. Each row: multiple of its pitch, level in dB relative to the fundamental.
HUM_OVERTONES = [(2.0, -12), (3.0, -24)]
HUM_HZ = 138.2   # mean pitch


def close_noises():
    """A wavering hum, low rumble and a rustle near the microphone."""
    (hum_db, rumble_db), (rustle_db,) = in_time(LOW_END), in_time(RUSTLING)
    phase = 2 * np.pi * np.cumsum(HUM_HZ * (1 + 0.0013 * drift(21, size=N))) / SR
    overtones = sum(volts_from_db(db) * np.sin(k * phase) for k, db in HUM_OVERTONES)
    hum = np.sqrt(2) * (np.sin(phase) + overtones)
    hum = volts_from_db(hum_db + 1.5 * drift(9.7, size=N)) * hum
    rumble = volts_from_db(rumble_db) * coloured_noise(RUMBLE, patchy_db=1.4)
    rustle = volts_from_db(rustle_db) * coloured_noise(RUSTLE, patchy_db=0.5) * sides(-1.7)
    return hum + rumble + rustle


# Colour of the background. Each row: frequency in Hz, relative level in dB per Hz.
AIR = [(1700, -12.5), (2000, -21.5), (2900, -18), (3900, -19.5), (4500, -8.5), (5300, -15.5), (7000, -26),
       (9000, -17), (11000, -15.5), (14000, -19), (16000, -28.5)]
AIR_DB = -80.5   # rms


def far_noise_and_insects():
    """The bed under it all: steady noise whose bands flicker slightly."""
    return volts_from_db(AIR_DB) * coloured_noise(AIR, patchy_db=1.2)


def scene():
    """Direct sound of each source, its scattered tail, then the background."""
    direct, send = np.zeros((2, N)), np.zeros((2, N))
    for singer in [wren_trill, wren_soft_notes, neighbour, chippers, faint_birds]:
        heard, scattered = singer()
        direct, send = direct + heard, send + scattered
    harsh = broad_noises_and_rattle() + churrs()
    taps = close_taps()
    send = send + volts_from_db(-4) * harsh + volts_from_db(-7) * taps
    near = direct + harsh + taps + scatter(send)
    return near + far_birds() + close_noises() + far_noise_and_insects()


def top_cut(x):
    """Nothing passes above the cut-off."""
    return signal.sosfilt(signal.butter(12, 15700, fs=SR, output="sos"), x)


def record(dry):
    """The finished stereo mix as it is kept."""
    return top_cut(dry)


dry = scene()
out = record(dry)
master(out)
```